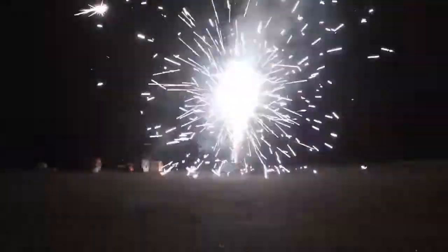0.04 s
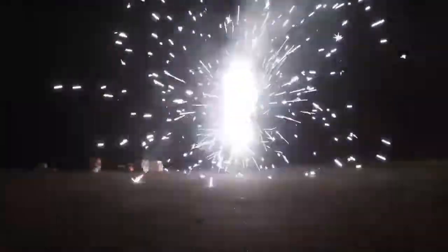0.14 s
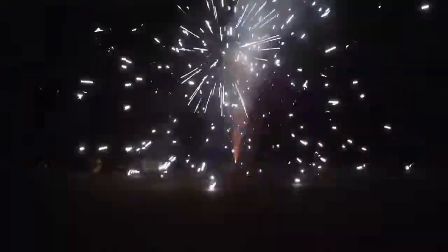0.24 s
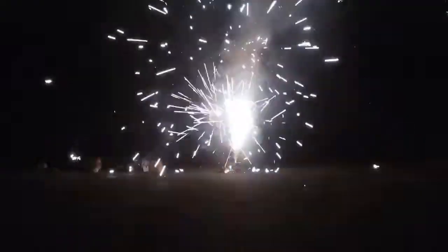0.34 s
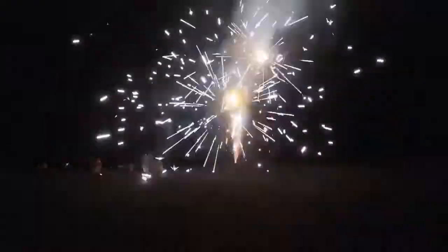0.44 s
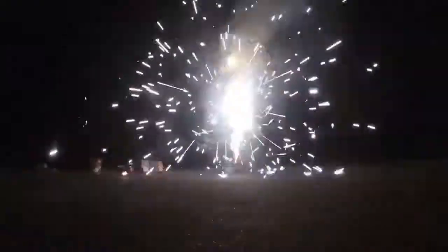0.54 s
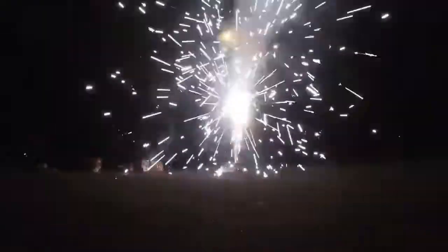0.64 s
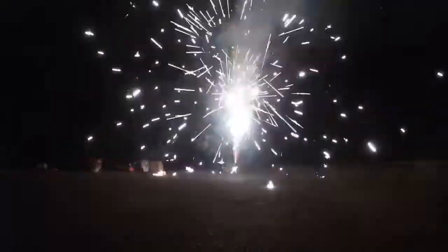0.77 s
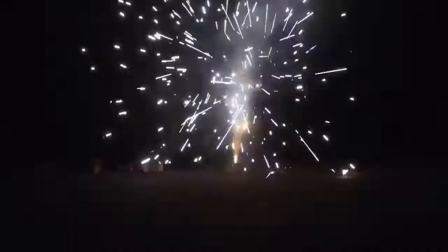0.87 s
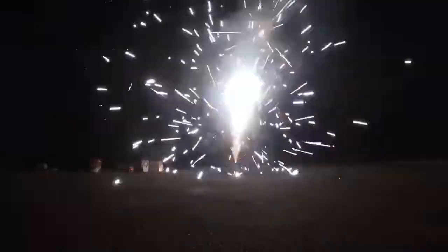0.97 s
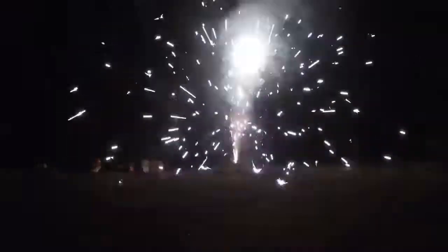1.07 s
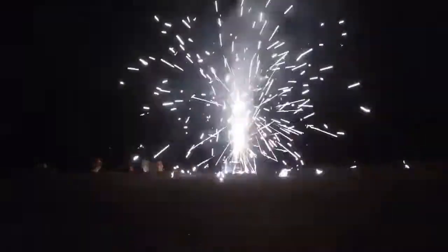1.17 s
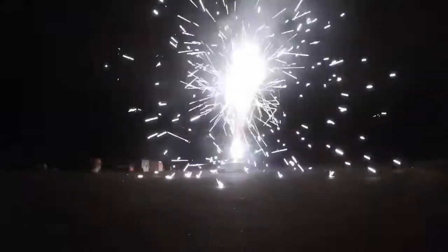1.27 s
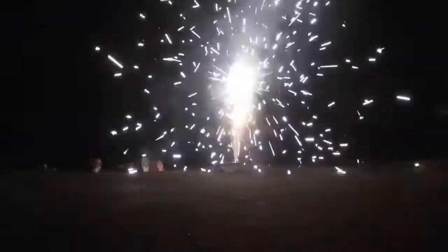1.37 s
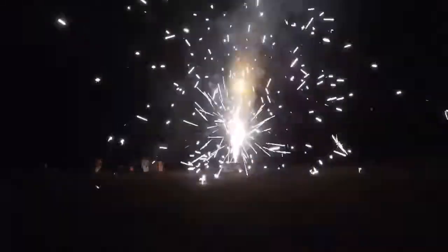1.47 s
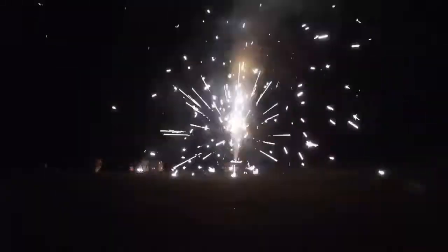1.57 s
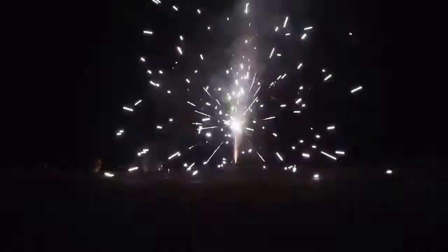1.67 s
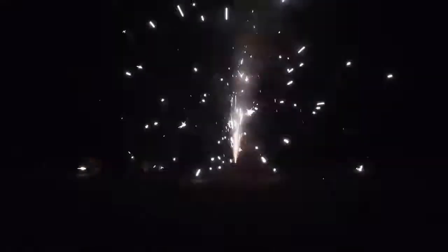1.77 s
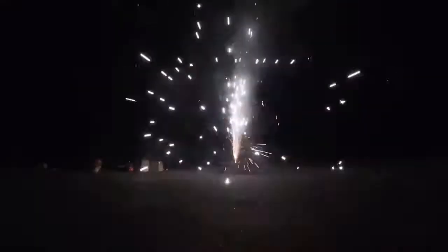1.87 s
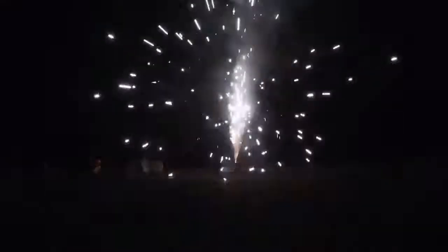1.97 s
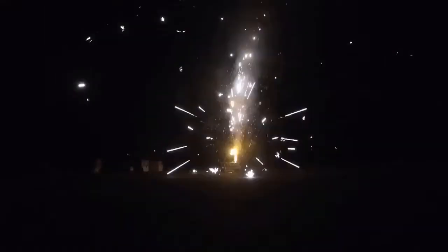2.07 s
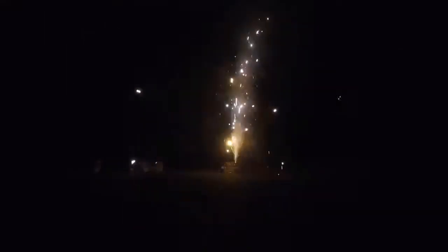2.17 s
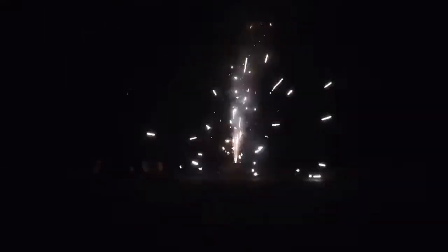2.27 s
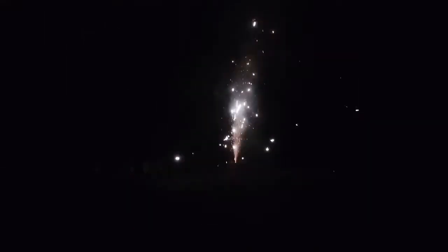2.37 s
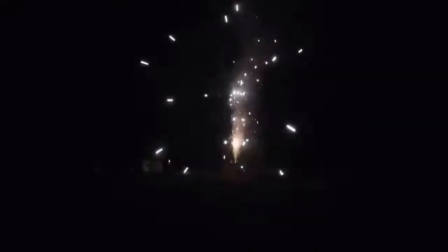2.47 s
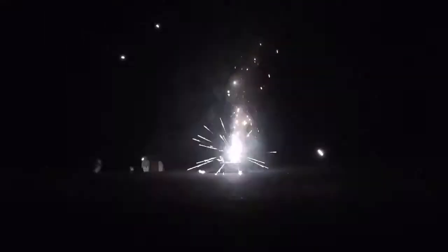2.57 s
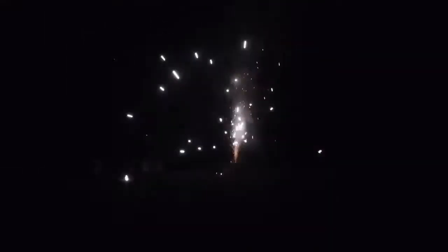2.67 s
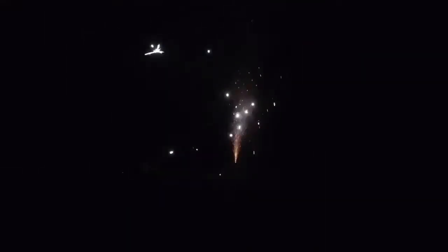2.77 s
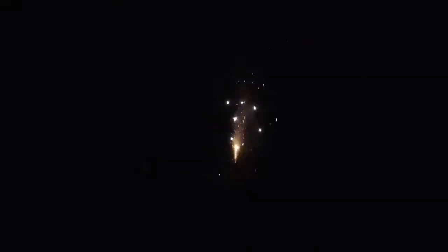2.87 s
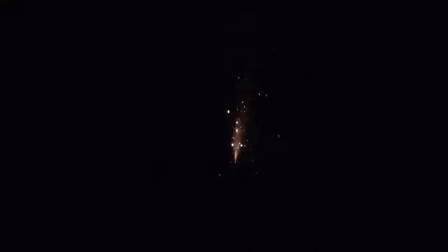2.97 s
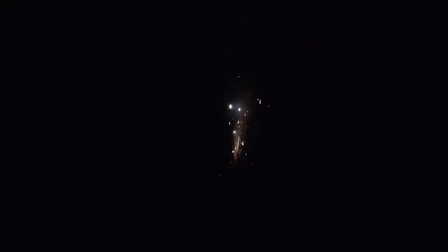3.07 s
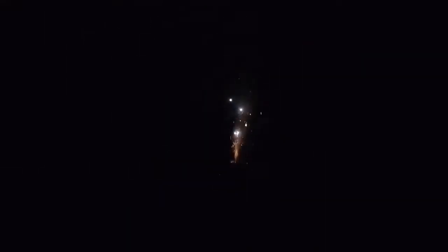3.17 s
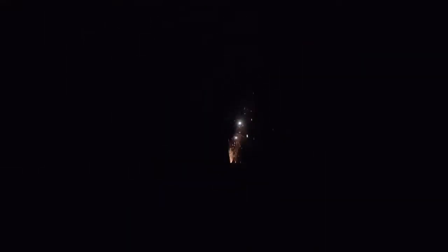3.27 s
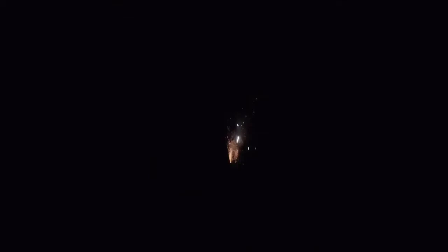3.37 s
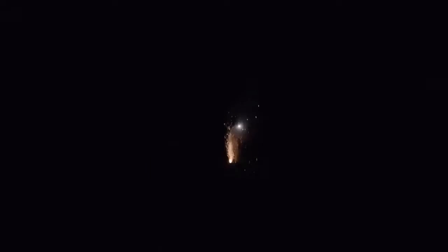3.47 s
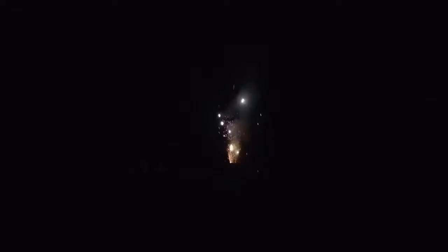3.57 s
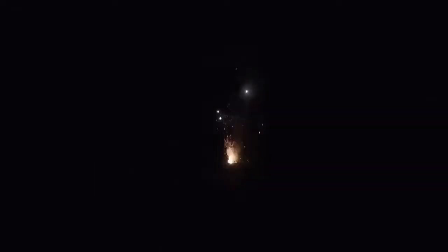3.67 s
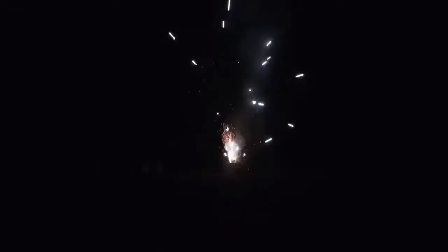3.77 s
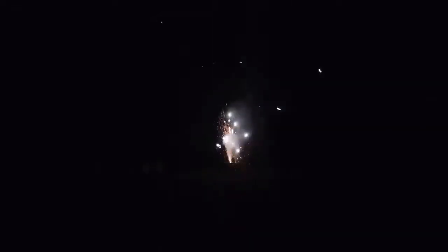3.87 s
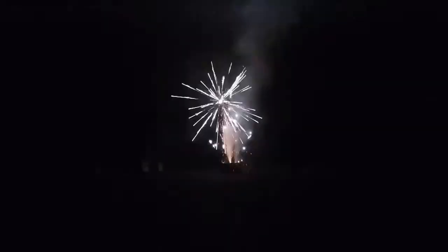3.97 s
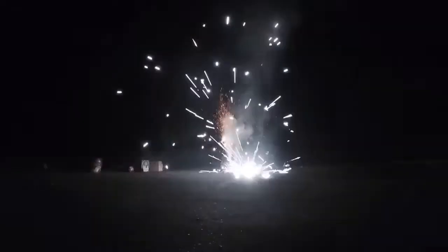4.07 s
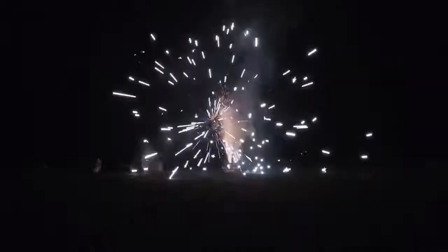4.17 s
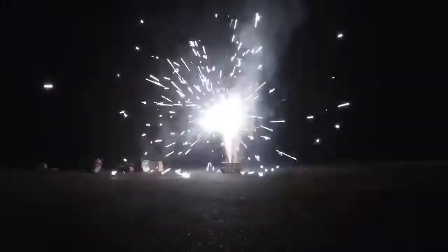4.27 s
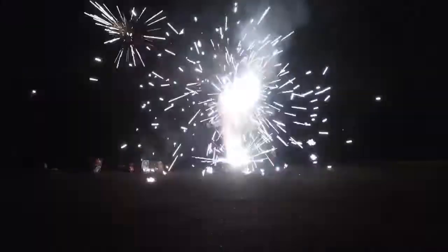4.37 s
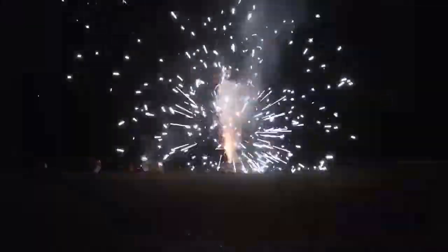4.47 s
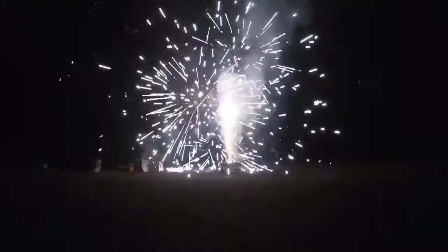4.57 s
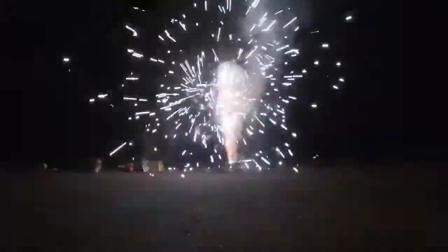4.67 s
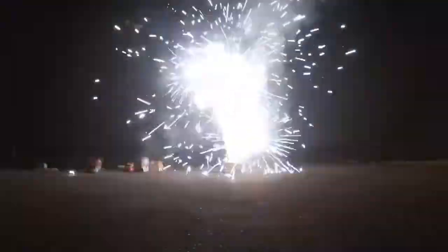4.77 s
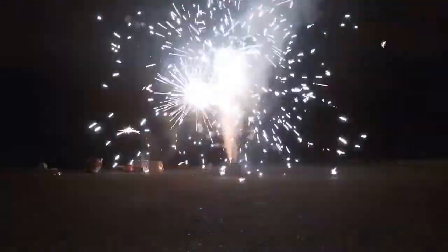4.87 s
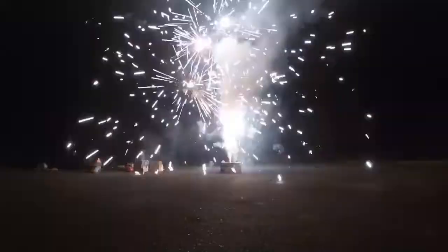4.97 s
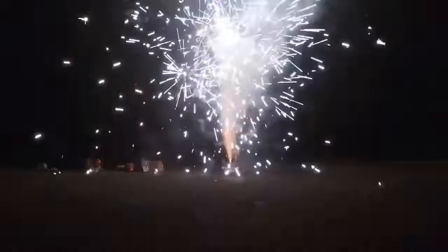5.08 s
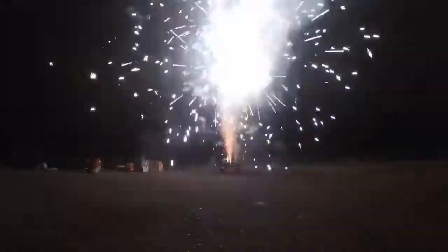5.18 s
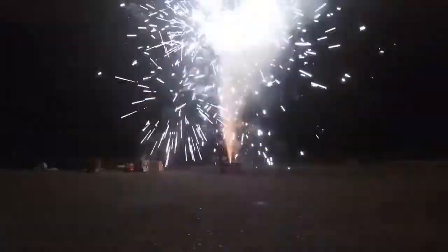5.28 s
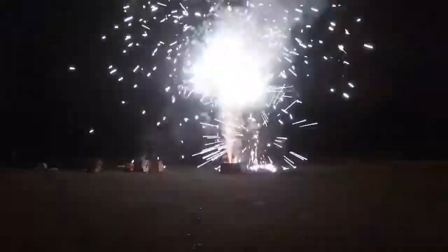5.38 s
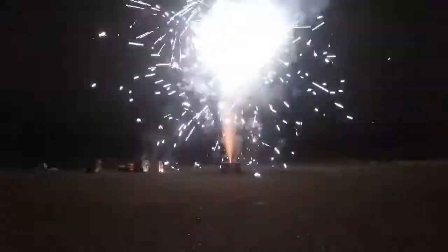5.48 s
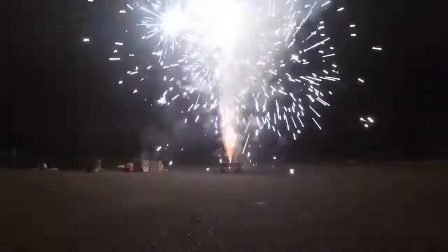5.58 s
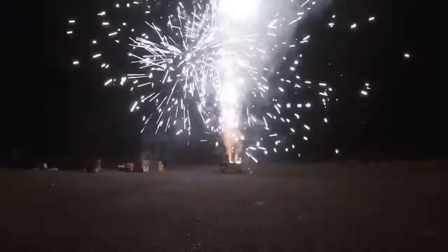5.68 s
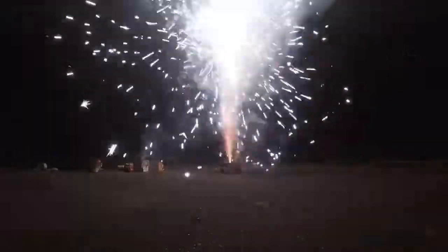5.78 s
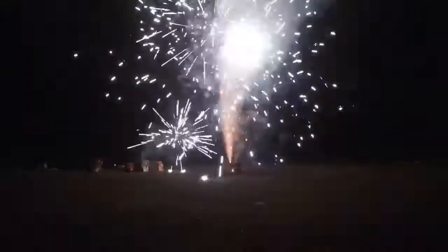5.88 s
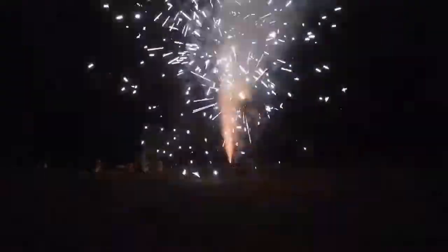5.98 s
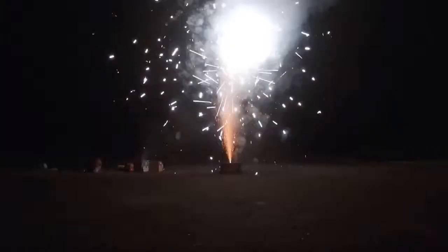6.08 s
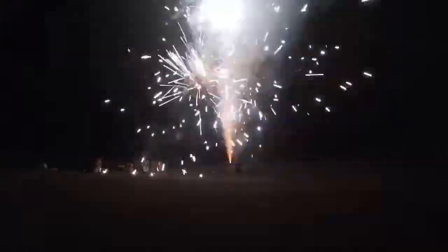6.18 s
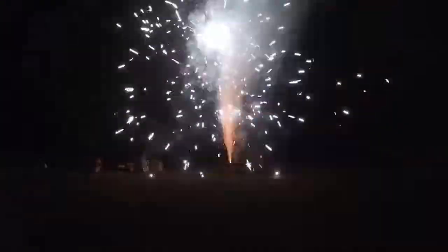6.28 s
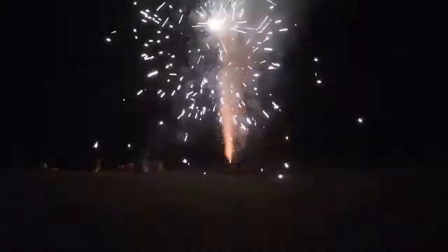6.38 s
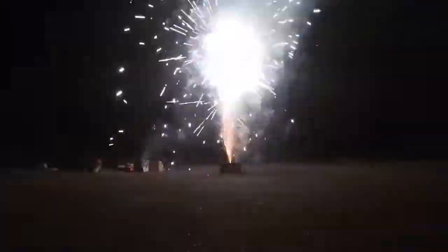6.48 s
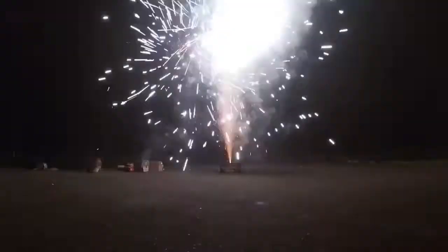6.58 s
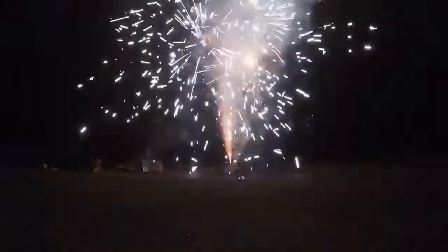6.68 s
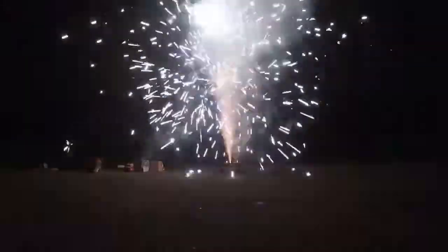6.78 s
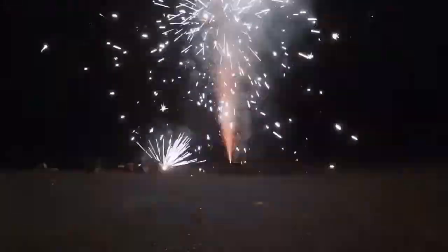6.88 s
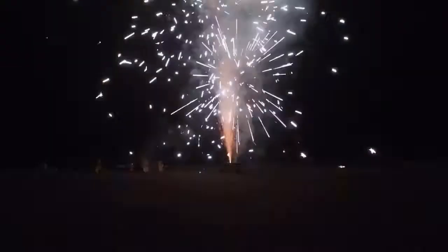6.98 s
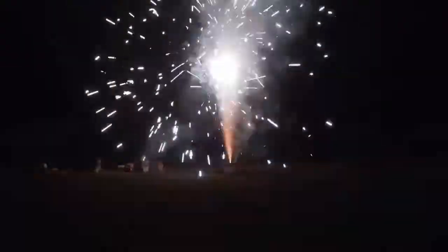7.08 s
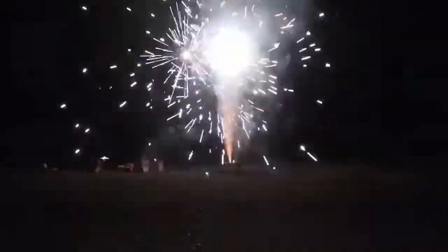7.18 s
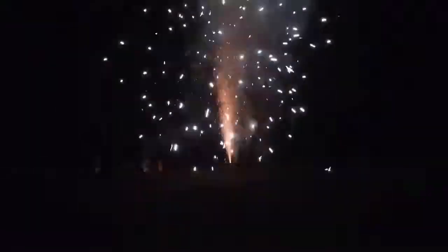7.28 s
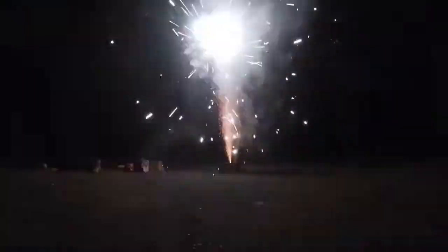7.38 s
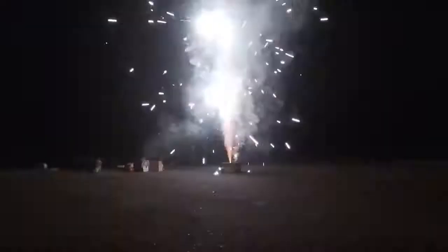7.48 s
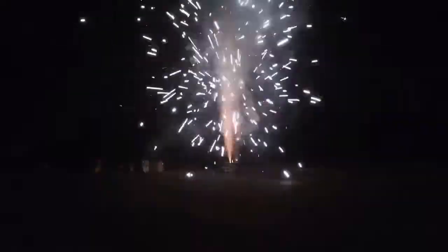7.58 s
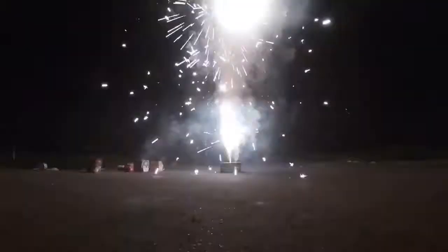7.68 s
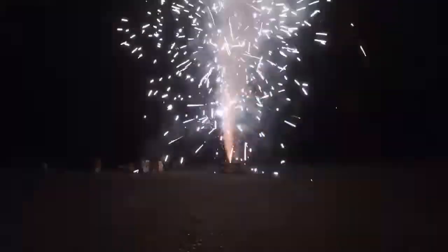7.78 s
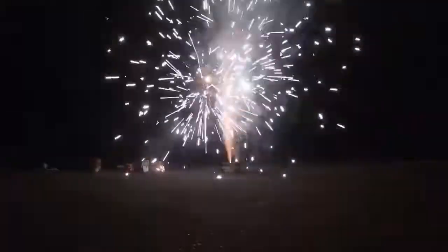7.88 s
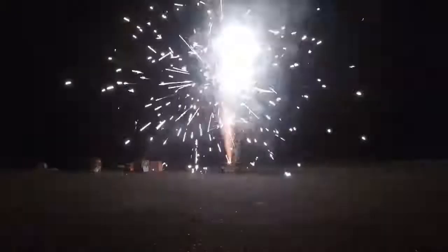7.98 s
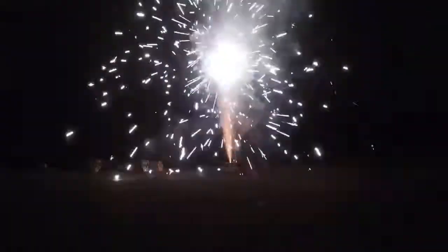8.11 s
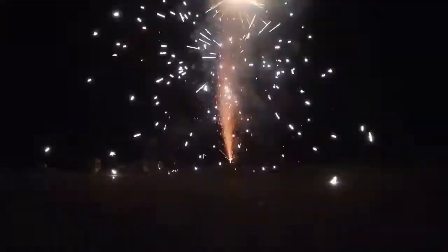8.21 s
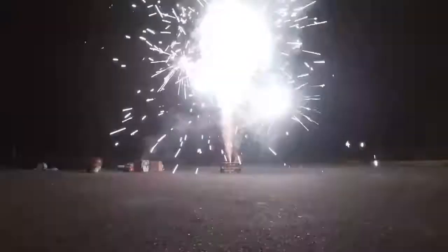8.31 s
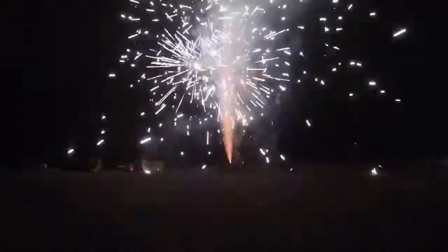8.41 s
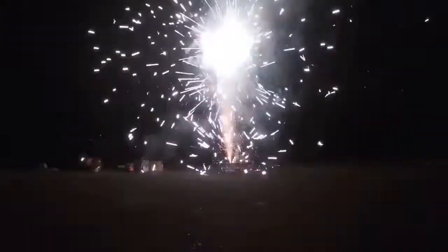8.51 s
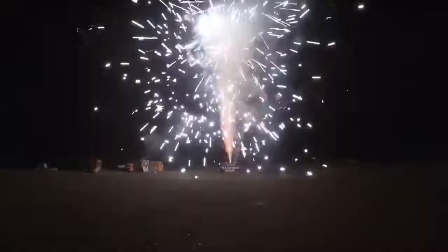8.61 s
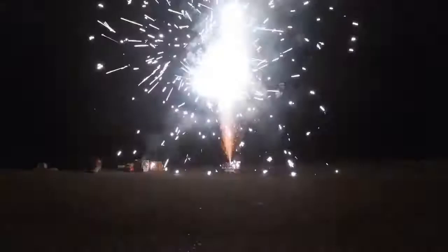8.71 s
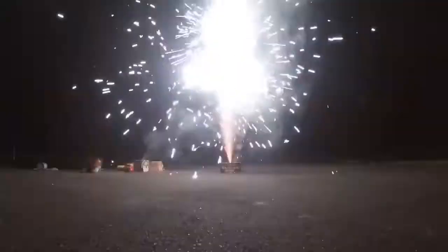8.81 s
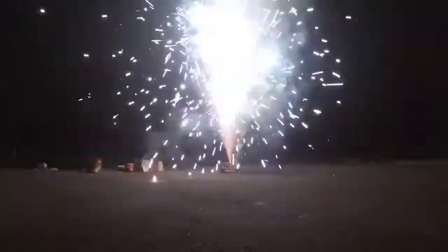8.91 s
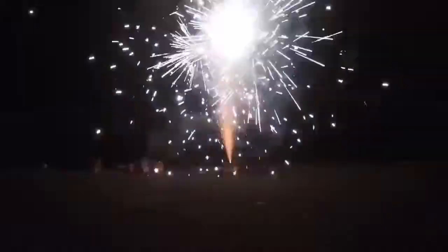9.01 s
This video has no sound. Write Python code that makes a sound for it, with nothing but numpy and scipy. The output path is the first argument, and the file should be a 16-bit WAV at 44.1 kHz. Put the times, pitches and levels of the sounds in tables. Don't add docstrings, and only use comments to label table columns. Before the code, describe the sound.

A fountain firework on the ground crackles hard and fast, dozens of dry snaps a second, the strongest overloading the microphone with dull thumps. After about a second it thins to scattered pops, leaving faint gas hiss and insects chirring. Near four seconds a second charge catches and dense crackling continues to the end. Open outdoor place, phone some metres away.

```python
import sys
import numpy as np
from scipy import signal
from scipy.fft import rfft, irfft
from scipy.io import wavfile
from scipy.ndimage import uniform_filter1d

SR = 44100
rng = np.random.default_rng(int(sys.argv[2]) if len(sys.argv) > 2 else 0)


def how_loud(loudness_db):
    steps = np.asarray(loudness_db, float) / 20
    return 10 ** steps


def output_pcm(signal):
    pcm = np.clip(np.atleast_2d(signal).T, -1, 1) * 32767
    wavfile.write(sys.argv[1], SR, np.round(pcm).astype(np.int16))


N = 399105
LIT_S = 3.8

# (frequency [Hz], level [dB per Hz])
CRACK_COLOUR = [(85, -21.5), (145, 0.5), (252, -0.5), (586, -1), (1690, -4), (3340, -10.5), (4530, -7.5),
                (5700, -10.5), (6700, -29), (12700, -34), (15500, -32), (20000, -37)]
# (time [s], level [dB])
JET_LEVEL = [(0.0, -30.5), (0.72, -31.5), (2.3, -39), (2.45, -40.5), (2.6, -47), (2.97, -37.5),
             (3.03, -27.5), (3.165, -28.5), (3.18, -37), (3.42, -34.5), (3.48, -26.5), (3.59, -25.5),
             (3.61, -37), (3.8, -27), (4.0, -25), (7.39, -29), (9.05, -28.5)]
# (time [s], signed lurch [share of full scale])
LONE_BANGS = [(0, -0.01), (1.2353, -0.16), (1.291, 0.15), (1.3103, 0.23), (1.384, -0.46), (1.537, -0.098),
              (1.567, 0.23), (1.5982, 0.31), (1.7084, -0.3), (1.7184, 0.0067), (1.7339, -0.15),
              (1.8861, 0.34), (2.0818, -0.3), (2.2529, -0.44), (3.3932, -0.27), (3.4129, 0.18),
              (3.647, -0.28), (3.7287, 0.31), (3.753, -0.19), (3.768, -0.11), (3.7757, 0.35),
              (3.813, -0.17), (3.83, 0.14), (3.84, -0.0069)]


def curve(rows):
    s, value = np.transpose(sorted(rows))
    return np.interp(np.arange(N) / SR, s, value)


def sample_at(s):
    return np.clip(s * SR, 0, N - 1).astype(int)


def place(s, shapes):
    out = np.zeros(N + shapes.shape[1])
    np.add.at(out, sample_at(s)[:, None] + np.arange(shapes.shape[1]), shapes)
    return out[:N]


def band(x, lo_hz, hi_hz, order=2):
    return signal.sosfilt(signal.butter(order, (lo_hz, hi_hz), "band", fs=SR, output="sos"), x)


def response(points, size=2048):
    hz, db = np.transpose(points)
    log_hz = np.log(np.arange(1, size // 2 + 2) * SR / size)
    cepstrum = irfft(np.interp(log_hz, np.log(hz), db) * np.log(10) / 20)
    cepstrum[1:size // 2] *= 2
    cepstrum[size // 2:] = 0
    out = irfft(np.exp(rfft(cepstrum)))
    return out / np.sqrt(np.sum(out ** 2))


def ring(x, kernel):
    return signal.fftconvolve(x, kernel)[:N]


def cracks(burst_s):
    # (time [s], level [dB])
    ceiling = [
        (0, -17.5),
        (1.5, -19.5),
        (2.3, -15),
        (3.395, -4),
        (3.41, -15),
        (3.65, -9),
        (3.9, -13.5),
        (5.5, -14.5),
        (9.05, -16),
    ]
    # (time [s], level [dB])
    pops = [(1.2832, -17.5), (1.3485, -18), (1.438, -24), (1.4542, -24), (1.4744, -18), (1.4946, -22),
            (1.548, -17.5), (1.5929, -18.5), (1.7046, -15), (1.759, -20), (1.7865, -24), (1.912, -18.5),
            (2.022, -24), (2.071, -22.5), (2.1017, -22.5), (2.1913, -21.5), (2.1969, -18.5), (2.231, -14),
            (2.2595, -28), (2.2804, -19.5), (2.4086, -19.5), (2.4647, -21), (2.5085, -20.5),
            (2.6326, -18.5), (2.742, -17.5), (2.7674, -14), (2.959, -9.5), (3.227, -28.5), (3.2885, -9.5),
            (3.6, -4.5)]
    # (time [s], level [dB])
    more_pops = [
        (1.4155, -26),
        (1.481, -22.5),
        (1.8158, -27),
        (1.893, -23),
        (1.9167, -24.5),
        (1.9632, -28.5),
    ]
    # (time [s], level [dB])
    sharp_first = [(0.137, -23), (0.2154, -24), (0.2248, -22), (0.2572, -21.5), (0.2608, -16),
                   (0.3846, -20), (0.414, -17), (0.464, -18), (0.5637, -32), (0.5983, -15.5),
                   (0.603, -14.5), (0.6554, -24), (0.6613, -21), (0.7737, -23), (1.093, -17.5),
                   (0.8996, -14), (0.9343, -13), (0.2832, -23), (0.9822, -22), (1.005, -14.5),
                   (1.1357, -16.5), (1.147, -15), (1.179, -22)]
    sharp_second1 = [(3.7806, -21), (3.8928, -13.5), (3.9255, -14), (3.9426, -10.5), (3.9845, -10),
                     (3.9934, -28), (4.0139, -11.5), (4.0306, -13), (4.0404, -14.5), (3.9894, -17),
                     (4.0747, -14), (4.1789, -15), (4.2191, -11), (4.243, -14), (4.3063, -11),
                     (4.3101, -13), (4.3368, -12), (4.3904, -21), (4.396, -21), (4.399, -23), (4.455, -14),
                     (4.488, -12), (4.64, -10.5), (4.6618, -23), (4.672, -21), (4.4647, -19.5),
                     (4.708, -11.5), (4.7441, -14), (4.7765, -19), (4.7928, -19), (4.8205, -17),
                     (4.8504, -16.5), (4.8553, -10.5), (4.8609, -16), (4.899, -15)]
    sharp_second2 = [(4.9166, -13), (4.9585, -15.5), (4.9816, -16), (4.986, -15.5), (5.0297, -27.5),
                     (5.038, -14), (5.044, -24), (5.0638, -15.5), (5.0748, -30), (5.116, -27), (5.122, -11),
                     (5.134, -14), (5.1762, -18), (5.2066, -27), (5.2279, -19), (5.266, -26), (5.3, -21),
                     (5.3088, -14.5), (5.3256, -18), (5.3432, -12.5), (5.351, -30), (5.3604, -15),
                     (5.3827, -15), (5.3868, -18), (5.393, -13), (5.4078, -12.5), (5.474, -23),
                     (5.5787, -17), (5.5865, -14), (5.61, -19), (5.6202, -10), (5.5374, -22), (5.6983, -13),
                     (5.2838, -24), (5.2968, -22), (5.8439, -20), (5.9534, -15), (5.9006, -23), (5.993, -11),
                     (6.0206, -11), (5.846, -12), (6.07, -26), (6.139, -23), (6.1472, -12.5), (6.1576, -16)]
    sharp_second3 = [(6.2117, -20), (6.223, -14), (6.2536, -13.5), (6.2698, -14), (6.28, -21),
                     (6.2913, -20), (6.372, -14.5), (6.4223, -13.5), (6.4437, -28), (6.48, -19),
                     (6.569, -13), (6.595, -13), (6.6795, -12.5), (6.8006, -18), (6.855, -17),
                     (7.0562, -13), (7.1064, -12), (7.1622, -13.5), (7.196, -12), (7.2, -20), (7.391, -12),
                     (7.437, -19), (7.4705, -14), (7.476, -15), (7.5094, -15), (7.5454, -21), (7.647, -26),
                     (7.655, -19)]
    sharp_second4 = [(7.7435, -16), (7.7486, -14), (7.7596, -17), (7.7752, -14.5), (7.7837, -20), (7.877, -16),
                     (7.9163, -10), (7.9574, -14), (8.079, -17), (8.1695, -17.5), (8.174, -21),
                     (8.3103, -18.5), (8.3366, -16), (8.3526, -23), (8.404, -11.5), (8.4454, -16),
                     (8.462, -24), (8.4845, -15), (8.4882, -13.5), (8.5037, -19), (8.5089, -16), (8.541, -18),
                     (8.545, -20), (8.22, -17), (8.57, -20), (8.5946, -15), (8.665, -12), (8.674, -14),
                     (8.686, -16), (8.7413, -13.5), (8.784, -16), (8.787, -11.5), (8.817, -26), (8.8483, -13),
                     (8.9196, -15.5), (8.997, -16), (9.0028, -13.5), (9.0079, -33), (9.0346, -22),
                     (9.0444, -15)]

    clean = pops + more_pops + sharp_first + sharp_second1 + sharp_second2 + sharp_second3 + sharp_second4
    clean_s, clean_db = np.transpose(clean)
    scatter = np.minimum(rng.standard_normal(len(burst_s)), 1)
    held_db = curve(ceiling)[sample_at(burst_s)] + 2.9 * scatter
    clean_splatter = np.where(clean_s > LIT_S, .4, .08)[:, None]
    blasts = fronts(burst_s, held_db, splatter=0.4)
    blasts = blasts + fronts(clean_s, clean_db, splatter=clean_splatter) + sparks(burst_s)

    t = np.arange(SR // 2) / SR
    slap = how_loud(-43.0) * np.exp(-((t - .0066) / 0.00036) ** 2)
    echoes = slap + how_loud(-77) * np.exp(-t / 0.32)
    rustle = rng.standard_normal(N) * np.sqrt(np.abs(ring(blasts ** 2, echoes ** 2)))
    return how_loud(19.5) * ring(blasts + np.diff(rustle, prepend=0), response(CRACK_COLOUR))


def fronts(s, db, splatter, size=256):
    # (time [s], lag [ms])
    bounce = [
        (3.3, .17),
        (3.39, .13),
        (3.6, .12),
        (3.645, .17),
    ]
    # (time [s], share of front, push time
    # [ms])
    body = [
        (.4, 0.14, 0.58),
        (1.15, 0.16, 0.58),
        (1.5, 0.016, 0.42),
        (3.1, 0.011, 0.051),
        (3.38, -0.26, 0.047),
        (3.66, -0.26, 0.049),
        (3.9, -0.041, 0.031),
        (5.6, 0.23, 0.039),
        (7.2, 0.037, 0.11),
    ]

    t = np.arange(size) / SR
    start = int(.0005 * SR)
    after = np.clip(t - .0005, 0, 1)
    chance = rng.standard_normal((len(db), size + 4))
    crowd = np.where((s > 1.2) & (s < LIT_S), .25, 1.2)

    shape = splatter * chance[:, 4:] * np.exp(-np.abs(t - .0008) / 0.00068)
    shape -= uniform_filter1d(shape, size=24, axis=1)
    rows = np.arange(len(db))
    shape[rows, start] += 1

    lag_s = np.interp(s, *np.transpose(bounce)) / 1000 * np.exp(.25 * crowd * chance[:, 0])
    lag = np.clip(lag_s * SR, 2, 60).astype(int)
    shape[rows, start + lag] += .45

    thin = np.clip(0.073 + 0.2 * crowd[:, None] * chance[:, 3:4], -.5, .9)
    shape -= thin * np.roll(shape, shift=4, axis=1)

    ring_hz = 1300 * np.exp(.5 * chance[:, 4:5])
    casing = np.exp(-after / 0.00088) * np.sin(2 * np.pi * ring_hz * after)
    shape += 0.082 * crowd[:, None] ** 2 * casing

    heard = np.abs(rfft(shape) * rfft(response(CRACK_COLOUR, size))) ** 2
    shape /= np.sqrt(heard.mean(axis=1, keepdims=True))

    body_s, body_share, body_ms = np.transpose(body)
    push_s = np.interp(s, body_s, body_ms) / 1000 * np.exp(.4 * crowd * chance[:, 1])
    age = after / push_s[:, None]
    share = np.interp(s, body_s, body_share) * np.exp(0.68 * crowd * np.minimum(chance[:, 2], 1))
    shape += share[:, None] * age * np.exp(-age)
    return place(s - .0008, shape * how_loud(db)[:, None])


def sparks(burst_s):
    s = burst_s[len(LONE_BANGS)::6]
    chance = rng.standard_normal((len(s), 2))
    spark_s = np.clip(s + 0.0081 * np.abs(chance[:, 0]), .01, N / SR - .01)
    return fronts(spark_s, -31 + 2 * chance[:, 1], splatter=0.88)


def lurches(s, swing):
    t = np.clip(np.arange(SR // 20) / SR - .0011, 0, 1)
    leak_s = 0.0032 * np.exp(0.5 * np.clip(rng.standard_normal((len(s), 1)), -1, 1))
    shape = (1 - np.exp(-t / 0.00081)) ** 2 * np.exp(-t / leak_s)
    shape = shape / shape.max(axis=1, keepdims=True)
    thump = place(s, 2.49 * swing[:, None] * shape)
    return signal.sosfilt(signal.butter(1, 5, "high", fs=SR, output="sos"), thump)


def late_bass(x, hz, width):
    pole = np.exp((2j * hz - width) * np.pi / SR)
    a = np.poly([pole, pole.conjugate()]).real
    return signal.lfilter(a[::-1], a, x)


def jet():
    # (frequency [Hz], level [dB per Hz])
    hiss_colour = [(200, 11.5), (900, 3), (2500, 4), (3600, -1.5), (4600, -1), (5700, -1), (6500, -37),
                   (16000, -20.5)]
    hold = 200
    steps = np.repeat(rng.standard_normal(N // hold + 1), hold)
    sputter = uniform_filter1d(steps, size=hold)[:N]
    hiss = ring(rng.standard_normal(N) * how_loud(1.5 * sputter), response(hiss_colour))
    return (band(hiss, 147, 16800, order=8) + how_loud(-18.5) * hiss) * how_loud(curve(JET_LEVEL) - 11.0)


def insects():
    # (time [s], level over the jet [dB])
    insect_level = [
        (1.4, -25),
        (1.6, 0),
        (2.5, 11),
        (3.05, 4),
        (3.42, -6),
        (3.46, 17),
        (3.6, 9),
        (3.64, 8),
        (3.9, 9.5),
        (4.3, -29),
    ]
    sway = np.cumsum(rng.standard_normal(N)) * 3 / np.sqrt(SR)
    low_kind = band(rng.standard_normal(N), 7000, 7500, order=3) * np.sin(sway) ** 2 / 2
    high_kind = band(rng.standard_normal(N), 7400, 7900, order=3)
    return (low_kind + high_kind) * how_loud(curve(insect_level) + curve(JET_LEVEL) - 18.0)


def grit(x):
    cracking = band(x, 2290, 2690)
    close = halo(cracking, reach_s=0.0015, linger=2.4)
    far = halo(cracking, reach_s=.008)
    wide = how_loud(3.0) * ring(np.diff(close, prepend=0), response(CRACK_COLOUR))
    wobble = how_loud(11.0) * band(halo(band(x, 71, 570), reach_s=0.0023), 100, 250)
    thumping = uniform_filter1d(np.abs(band(x, 30, 150)), size=2600)
    overdriven = np.clip(thumping / .06, .15, 1)
    edge = how_loud(13) * strips(far * overdriven)
    return edge + wide + wobble + warbles(far)


def halo(x, reach_s, linger=1):
    lag = np.arange(-SR // 20, SR // 20 + 1) / (reach_s * SR)
    reach = np.exp(np.minimum(lag, -lag / linger))
    power = signal.fftconvolve(x ** 2, reach / reach.sum(), "same")
    return rng.standard_normal(N) * np.sqrt(np.abs(power))


def strips(far):
    strips_hz, width_hz, hold = (4750, 5200, 5450, 5750), 280, int(.08 * SR)
    share = rng.random((N // hold + 1, len(strips_hz))) ** 6
    share = np.repeat(share / share.sum(axis=1, keepdims=True), hold, axis=0)
    share = uniform_filter1d(share, size=hold // 4, axis=0)[:N]
    out = 0
    for k, hz in enumerate(strips_hz):
        out = out + np.sqrt(np.abs(share[:, k])) * band(far, hz - width_hz / 2, hz + width_hz / 2)
    return out


def warbles(far):
    # (start [s], end [s], frequency [Hz], level [dB])
    warble_rows = [(3.36, 3.406, 1460, -32), (3.369, 3.404, 5240, -29), (3.645, 3.65, 5430, -25),
                   (3.632, 3.661, 1480, -29), (3.7, 3.742, 1410, -24), (3.708, 3.744, 5400, -20),
                   (6.77, 6.796, 880, -23), (7.555, 7.585, 1060, -23), (7.588, 7.668, 1000, -23.5),
                   (7.73, 7.84, 840, -25), (7.855, 7.88, 800, -21), (8.216, 8.25, 806, -23),
                   (0.768, 0.826, 317, -25), (0.904, 0.952, 300, -12.5), (1.073, 1.167, 275, -10.5),
                   (3.293, 3.377, 298, -19), (4.355, 4.503, 317, -27), (8.285, 8.504, 318, -25),
                   (3.37, 3.398, 8100, -40), (3.8, 3.824, 5390, -20)]
    t, out = np.arange(N) / SR, 0
    for start, end, hz, db in warble_rows:
        swell = np.sin(np.pi * np.clip((t - start) / (end - start), 0, 1)) ** .5
        out = out + how_loud(db + 48) * swell * band(far, hz - 75, hz + 75)
    return out


def scene():
    # (time [s], signed lurch [share of full scale])
    first_fading = [(0.0124, 0.41), (0.0169, 0.093), (0.0313, -0.26), (0.061, 0.26), (0.067, -0.21),
                    (0.097, -0.16), (0.1077, 0.25), (0.114, 0.025), (0.1547, 0.11), (0.1603, -0.2),
                    (0.1697, -0.075), (0.1745, 0.17), (0.1963, -0.39), (0.2042, 0.2), (0.2377, 0.06),
                    (0.286, -0.28), (0.3126, -0.061), (0.3279, -0.14), (0.3638, 0.25), (0.4054, 0.099),
                    (0.4342, -0.23), (0.4413, 0.31), (0.4464, -0.22), (0.4723, 0.12), (0.5118, 0.31),
                    (0.5263, -0.15), (0.532, 0.3), (0.577, -0.19), (0.5878, 0.15), (0.627, 0.026),
                    (0.643, 0.22), (0.648, -0.21), (0.6722, 0.11), (0.6952, -0.31), (0.7027, -0.021),
                    (0.7287, 0.29), (0.759, 0.2), (0.7798, 0.26), (0.792, -0.042), (0.8, -0.14),
                    (0.8027, -0.14), (0.8095, -0.11), (0.8138, 0.3), (0.82, -0.18), (0.8446, 0.19),
                    (0.8484, -0.33), (0.8697, -0.33), (0.9272, 0.12), (0.942, 0.2), (0.9488, 0.17),
                    (0.9659, 0.15), (0.9758, 0.38), (1.0016, -0.23), (1.0177, 0.19), (1.0536, -0.21),
                    (1.0957, 0.38), (1.1092, 0.35), (1.152, 0.054), (1.173, 0.13)]
    second_part1 = [(3.905, -0.17), (3.9064, -0.011), (3.9306, 0.24), (3.955, 0.26), (3.958, -0.33),
                    (3.975, 0.12), (4.0215, -0.21), (4.0484, -0.34), (4.0558, 0.26), (4.0791, -0.2),
                    (4.0866, 0.04), (4.1046, -0.27), (4.1114, 0.012), (4.1355, -0.24), (4.172, -0.13),
                    (4.1866, 0.15), (4.1905, 0.21), (4.1948, 0.31), (4.2313, -0.26), (4.2352, 0.11),
                    (4.2766, -0.028), (4.2888, 0.27), (4.3153, 0.28), (4.3246, 0.28), (4.3674, 0.11),
                    (4.3805, -0.19), (4.406, 0.23), (4.416, 0.23), (4.4232, -0.2), (4.438, -0.21),
                    (4.4513, 0.13), (4.462, -0.2), (4.4925, -0.18), (4.5123, -0.14), (4.5238, 0.15),
                    (4.53, -0.13), (4.5487, 0.25), (4.568, -0.14), (4.5714, 0.095), (4.5936, -0.032),
                    (4.5968, 0.015)]
    second_part2 = [(4.6005, -0.18), (4.6144, 0.18), (4.645, -0.3), (4.6686, 0.023), (4.685, -0.14),
                    (4.714, 0.21), (4.7179, -0.14), (4.7231, 0.29), (4.7393, -0.062), (4.751, 0.22),
                    (4.7555, 0.075), (4.786, -0.081), (4.806, -0.11), (4.81, 0.33), (4.813, -0.051),
                    (4.832, -0.098), (4.8463, -0.066), (4.866, 0.26), (4.8947, -0.14), (4.9051, 0.072),
                    (4.9316, -0.16), (4.9383, 0.17), (4.947, -0.18), (4.9512, 0.15), (4.9621, -0.21),
                    (4.972, 0.11), (4.9904, 0.23), (5.015, -0.19), (5.0256, 0.033), (5.052, -0.095),
                    (5.0563, 0.22), (5.0957, 0.19), (5.1292, -0.24), (5.151, -0.09), (5.1635, 0.22),
                    (5.173, -0.21), (5.1798, 0.24), (5.188, -0.16), (5.1935, 0.058), (5.2016, 0.29),
                    (5.2105, 0.0078), (5.2352, 0.11), (5.239, -0.11)]
    second_part3 = [(5.254, 0.13), (5.2793, -0.07), (5.2874, -0.23), (5.291, 0.25), (5.3388, -0.13),
                    (5.3677, -0.086), (5.3983, 0.21), (5.4125, -0.17), (5.433, -0.12), (5.446, 0.2),
                    (5.451, -0.17), (5.4567, -0.033), (5.4676, -0.0064), (5.4851, 0.083),
                    (5.4904, 0.22), (5.5332, -0.18), (5.5416, -0.21), (5.5551, 0.19), (5.6154, 0.23),
                    (5.6446, -0.23), (5.674, 0.15), (5.6883, -0.22), (5.731, 0.21), (5.74, -0.21),
                    (5.7578, 0.26), (5.775, -0.17), (5.797, 0.062), (5.8248, -0.12), (5.855, 0.26),
                    (5.883, -0.15), (5.89, 0.22), (5.8971, -0.18), (5.92, -0.16), (5.9898, -0.22),
                    (5.9997, 0.17), (6.0453, 0.19), (6.0659, 0.19), (6.081, -0.17), (6.09, -0.24),
                    (6.0969, -0.18), (6.1297, -0.17), (6.133, 0.34)]
    second_part4 = [(6.1519, -0.019), (6.1663, 0.24), (6.204, -0.18), (6.227, 0.15), (6.2403, -0.27),
                    (6.261, 0.12), (6.2734, 0.2), (6.284, -0.33), (6.2979, 0.084), (6.3049, -0.22),
                    (6.3084, 0.32), (6.312, -0.18), (6.3247, 0.088), (6.3418, 0.17), (6.3462, -0.14),
                    (6.3753, 0.28), (6.401, -0.36), (6.41, 0.22), (6.418, -0.088), (6.4624, -0.16),
                    (6.489, 0.35), (6.4932, 0.019), (6.5095, -0.0076), (6.5315, 0.17), (6.5357, -0.31),
                    (6.55, -0.056), (6.576, 0.21), (6.591, -0.3), (6.6065, 0.24), (6.633, 0.16),
                    (6.6379, 0.34), (6.6998, -0.22), (6.7045, 0.21), (6.7281, 0.27), (6.742, 0.049),
                    (6.7537, -0.25), (6.7836, -0.12), (6.8113, 0.26), (6.8234, -0.19), (6.8347, 0.24),
                    (6.845, -0.19), (6.8715, 0.18), (6.9699, -0.15), (6.988, 0.28)]
    second_part5 = [(7.0241, -0.1), (7.035, -0.09), (7.063, 0.28), (7.091, 0.4), (7.1563, -0.16),
                    (7.175, 0.26), (7.2128, -0.33), (7.2174, -0.14), (7.2958, -0.099), (7.3026, 0.3),
                    (7.322, -0.25), (7.3349, 0.16), (7.3524, 0.0058), (7.357, 0.26), (7.3677, -0.11),
                    (7.3707, 0.42), (7.3814, 0.016), (7.4023, 0.21), (7.4256, -0.14), (7.441, 0.19),
                    (7.496, -0.25), (7.518, -0.16), (7.5352, 0.3), (7.54, -0.17), (7.567, -0.099),
                    (7.6008, -0.12), (7.6055, 0.31), (7.6118, -0.059), (7.6162, 0.041), (7.6301, -0.19),
                    (7.638, 0.25), (7.661, -0.046), (7.6736, 0.23), (7.6838, 0.14), (7.6947, -0.089),
                    (7.7015, 0.38), (7.7083, -0.089), (7.723, -0.078)]
    second_part6 = [(7.765, -0.3), (7.807, -0.16), (7.818, 0.11), (7.868, -0.21), (7.904, 0.29),
                    (7.933, 0.061), (7.9383, -0.14), (7.945, -0.045), (7.9484, 0.3), (7.9658, -0.19),
                    (7.977, 0.22), (7.9882, -0.29), (7.9962, 0.17), (8.0053, -0.099), (8.0345, 0.26),
                    (8.047, -0.28), (8.0612, 0.24), (8.071, -0.064), (8.1154, 0.28), (8.1191, -0.13),
                    (8.1365, -0.095), (8.1548, -0.18), (8.184, 0.17), (8.1935, -0.16), (8.2231, -0.28),
                    (8.2314, 0.18), (8.2432, 0.033), (8.2618, 0.21), (8.2717, 0.22), (8.2983, -0.16),
                    (8.3224, 0.21), (8.3452, -0.13), (8.3593, -0.18), (8.367, 0.18), (8.3775, -0.21),
                    (8.382, 0.11), (8.3844, -0.39), (8.388, 0.081)]
    second_part7 = [(8.4167, -0.17), (8.4502, -0.2), (8.463, -0.3), (8.492, 0.25), (8.5, -0.13),
                    (8.5378, -0.14), (8.5546, -0.22), (8.5644, 0.13), (8.587, -0.38), (8.5975, 0.14),
                    (8.6397, -0.15), (8.6448, -0.12), (8.6789, 0.21), (8.708, -0.18), (8.711, 0.29),
                    (8.7262, -0.35), (8.7296, 0.1), (8.7511, -0.17), (8.7652, 0.31), (8.811, -0.15),
                    (8.8225, 0.26), (8.8307, -0.16), (8.84, 0.13), (8.8679, -0.21), (8.904, 0.27),
                    (8.9155, -0.21), (8.9412, -0.15), (8.957, -0.059), (8.9612, 0.4), (8.9696, 0.015),
                    (8.9788, -0.21), (9.0168, -0.23), (9.031, -0.31)]
    # (time [s], signed swing [share of full scale])
    sags = [(1.088, -0.028), (1.13, -0.32), (1.89, 0.07), (2.086, -0.19), (3.38, 0.037), (3.631, 0.093),
            (3.641, -0.12), (3.722, 0.18), (4.203, -0.13), (4.3402, 0.12), (4.47, -0.051), (8.1884, .13)]

    bursts = LONE_BANGS + first_fading + second_part1 + second_part2 + second_part3
    bursts = bursts + second_part4 + second_part5 + second_part6 + second_part7
    burst_s, lurch = np.transpose(bursts)
    soft_thumps = uniform_filter1d(lurches(*np.transpose(sags)), size=200)
    thumps = lurches(burst_s, lurch) + soft_thumps
    crackle = late_bass(cracks(burst_s), hz=310, width=237)
    return (crackle + thumps + jet() + insects())[None]


def low_pass(x):
    return signal.sosfilt(signal.butter(12, 16690, fs=SR, output="sos"), x)


def record(dry):
    held = np.tanh(0.7 * dry) / 0.91
    top_cut = signal.ellip(8, .2, 30, 15800, fs=SR, output="sos")
    mix = signal.sosfilt(top_cut, held + grit(held[0]))
    return low_pass(mix)


dry = scene()
out = record(dry)
output_pcm(out)
```